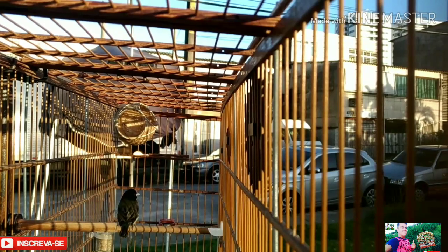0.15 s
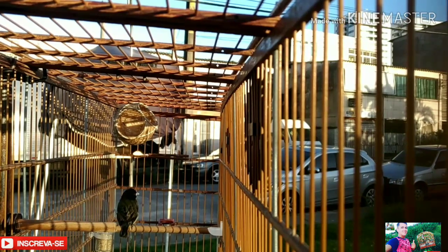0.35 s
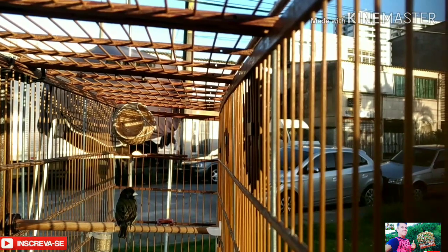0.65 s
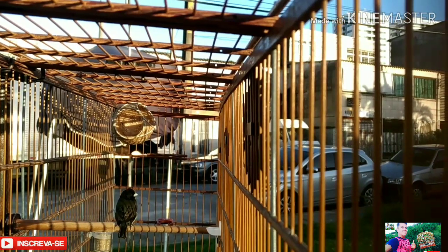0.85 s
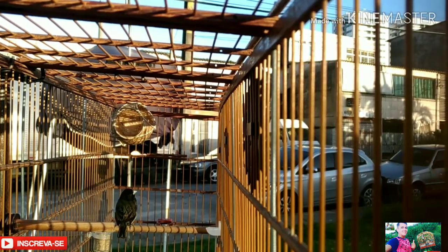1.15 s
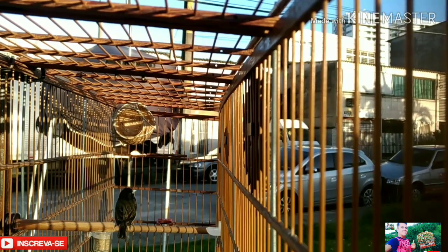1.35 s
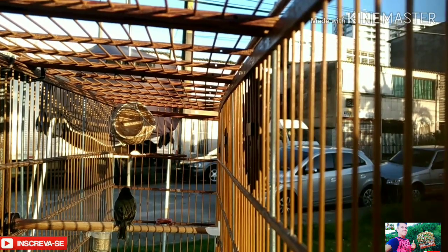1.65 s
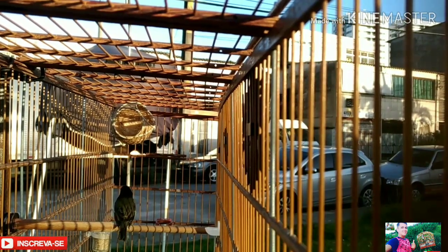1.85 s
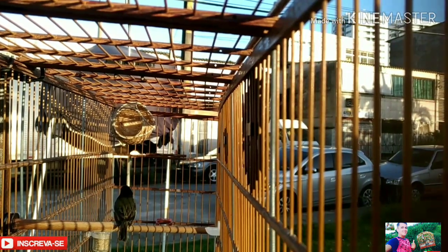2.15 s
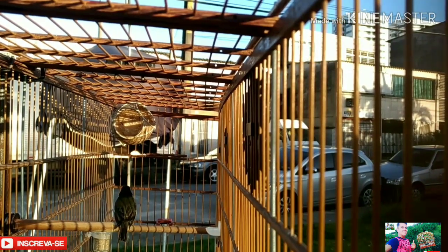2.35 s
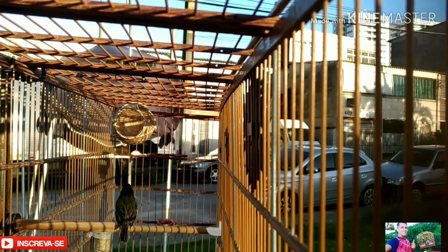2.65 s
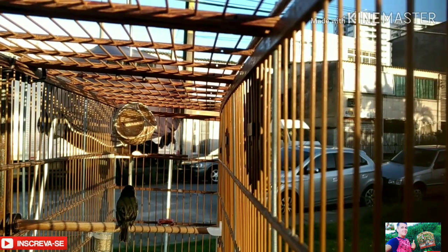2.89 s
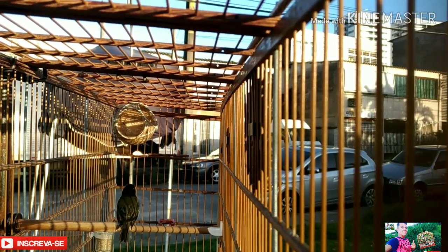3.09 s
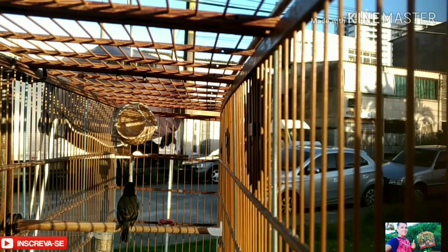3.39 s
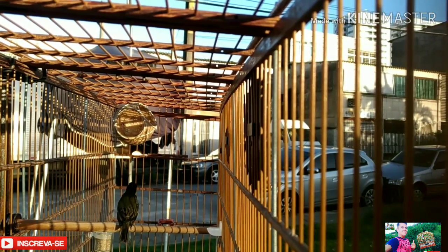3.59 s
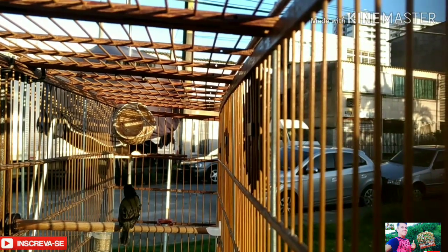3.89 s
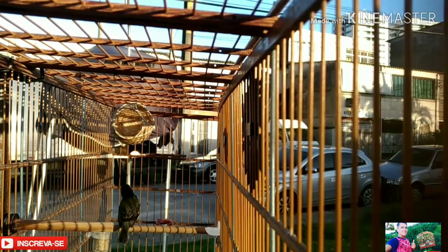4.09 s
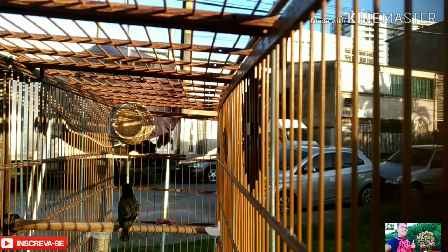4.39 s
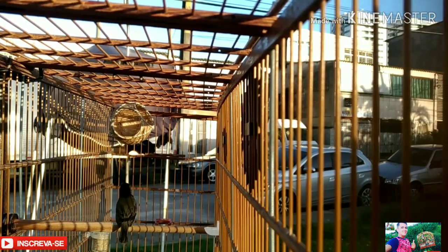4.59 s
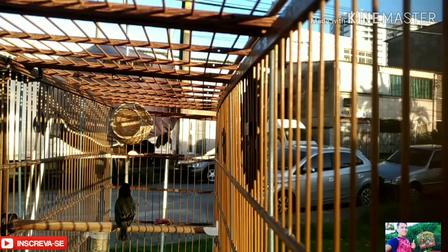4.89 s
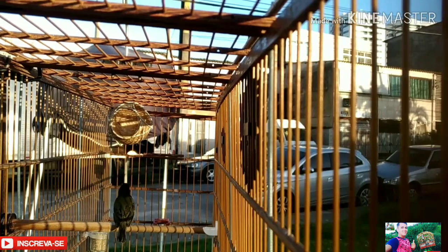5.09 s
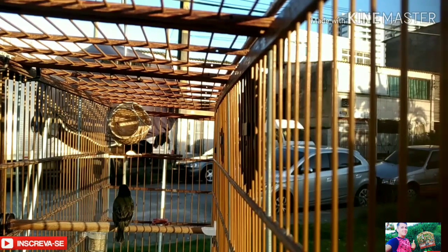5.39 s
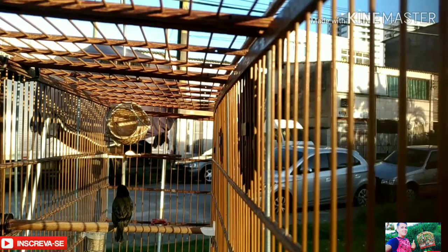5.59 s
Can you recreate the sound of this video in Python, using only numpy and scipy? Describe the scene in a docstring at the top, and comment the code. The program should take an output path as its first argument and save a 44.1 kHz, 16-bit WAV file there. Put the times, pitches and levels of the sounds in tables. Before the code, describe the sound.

A stereo outdoor street scene lasting about 5.7 seconds. Low, uneven traffic rumble and softer tyre hiss continue throughout, dipping slightly during the near song and rising again at the end. Very faint distant chirps come at 0.05 and 1.1-1.3 s. From 1.6 to about 2.9 s a far bird twitters in falling notes that quicken and sink in pitch. At 2.93 s a small caged bird starts close by with a tick and a soft rising whistle, then stronger trilled rising whistles at 3.3 and 3.5 s. A buzzy sinking trill follows at 3.7 s, steep down-slurs at 3.92 and 4.13 s, stuttered chips at 4.27 and 4.42 s, and a flick into a brief held, slightly falling whistle until 4.72 s. The tones are bright and nearly pure, with faint cage scatter and house-front echoes. Distant chirps follow from 4.8 s, the last a falling call near 5.3 s.

```python
"""Town traffic rumbles and hisses throughout, and small birds call and twitter far off.
Then a caged seedeater sings one quick phrase close by: a tick, three rising whistles, a trill, two steep
down-slurs, two stuttered chips and a held last note. House fronts across the street echo it.
The birds are gliding, nearly pure tones with overtones and breath noise; the traffic is shaped noise.
Delayed copies and fading noise tails make the cage, the walls and the street."""
import sys
import numpy as np
from scipy import signal
from scipy.fft import rfft, irfft, next_fast_len
from scipy.io import wavfile
from scipy.ndimage import uniform_filter1d, map_coordinates

SR = 44100
rng = np.random.default_rng(int(sys.argv[2]) if len(sys.argv) > 2 else 0)


def materialize(psi):
    """Save the field psi as 16-bit PCM at rate SR to the path in sys.argv[1].

    A 1-D psi becomes a single channel; in a 2-D psi each row is a channel.
    """
    bounded = np.clip(np.atleast_2d(psi).T, -1, 1)
    quanta = np.round(bounded * 32767).astype(np.int16)
    wavfile.write(sys.argv[1], SR, quanta)


N = 253134  # length of the scene in samples


def amp(db):
    """Turn decibels into a gain."""
    return 10 ** (np.asarray(db) / 20)


def unit(x):
    """Scale to an rms (average strength) of 1."""
    return x / np.sqrt(np.mean(x ** 2) + 1e-20)


def along(points, hz):
    """Read a table of (frequency, value) at any frequency, on a log frequency axis."""
    f, v = np.transpose(points)
    return np.interp(np.log(hz + 1), np.log(f), v)


def curves(rows, t):
    """Read each column after the time column at the times t."""
    s, *cols = np.transpose(rows)
    return [np.interp(t, s, c) for c in cols]


def wobble(rate, n):
    """A smooth random curve of n samples, with `rate` random points a second."""
    points = rng.standard_normal(int(n * rate / SR) + 4)
    return map_coordinates(points, [np.arange(n) * rate / SR])


def filtered(x, response):
    """Change the strength and timing of each frequency in x as `response` says."""
    m = next_fast_len(N + SR // 2)  # spare room, so that delays do not wrap round
    return irfft(rfft(x, m) * response(np.fft.rfftfreq(m, 1 / SR)), m)[..., :N]


def add(track, s, sound):
    """Mix a sound into a track at time s."""
    part = track[max(round(s * SR), 0):][:len(sound)]
    part += sound[:len(part)]


def note_times(length):
    """The sample times of a note, from zero."""
    return np.arange(max(int(length * SR), 16)) / SR


def gesture(rows):
    """The controls of one note, sample by sample from its first point to its last."""
    return curves(rows, np.arange(rows[0][0], rows[-1][0], 1 / SR))


def reflected(x, paths):
    """Each reflection is a delayed, weakened copy; this is their sum."""
    return filtered(x, lambda hz: sum(amp(db) * np.exp(-2j * np.pi * hz * delay) for delay, db in paths))


def diffuse(x, decay):
    """Many dense reflections act like a stereo noise tail in which each frequency dies at its own speed."""
    hz, t, z = signal.stft(rng.standard_normal((2, SR)), SR, nperseg=256)
    fading = z * amp(-60 * t / along(decay, hz)[:, None])
    tail = signal.istft(fading, SR, nperseg=256)[1]
    return signal.fftconvolve(np.atleast_2d(x), tail / np.linalg.norm(tail[0]), axes=1)[:, :N]


def patchy_noise(spectrum, patchy_db):
    """Stereo noise of rms 1: random gain patches in time and pitch make it uneven."""
    # how alike left and right are: (frequency [Hz], likeness [0-1])
    likeness = [(30, .55), (120, .62), (280, .8), (550, .48), (1100, .55), (2000, .3), (4000, .1),
                (10000, 0)]
    z = signal.stft(rng.standard_normal((2, N)), nperseg=512)[2]
    field = rng.standard_normal(z.shape[1:])
    field = uniform_filter1d(field, size=5, axis=0)  # smooth over frequency
    field = uniform_filter1d(field, size=14, axis=1)  # smooth over time
    pair = signal.istft(z * amp(patchy_db * unit(field)), nperseg=512)[1][:, :N]

    def shape(hz):
        # more of the shared middle sound makes left and right more alike
        turn = np.arccos(np.clip(along(likeness, hz), -1, 1)) / 2
        return amp(along(spectrum, hz)) * np.array([np.cos(turn), np.sin(turn)])

    mid, side = filtered(pair, shape)
    return unit(np.array([mid + side, mid - side]))


def traffic(lead=0.0003984):
    """Uneven engine rumble under smoother tyre wash; both reach the left microphone `lead` seconds early."""
    # level of the background rumble and hiss, which sinks during part of the near bird's song,
    # before the fixed lifts below: (time [s], engine rumble level [dB], tyre noise level [dB])
    background_levels = [(0.0, -46.5, -55.5), (0.05, -43.5, -56), (0.25, -52.5, -57.5), (0.3, -45.5, -57),
                         (1.28, -46.5, -56.5), (1.74, -41, -57.5), (1.8, -47, -55.5), (1.95, -42.5, -57.5),
                         (3.23, -47.5, -56.5), (3.74, -54.5, -60), (3.95, -50, -60), (3.98, -54.5, -60.5),
                         (4.33, -52, -58), (4.4, -49, -55.5), (4.68, -51.5, -61), (4.84, -47, -54.5),
                         (5.61, -44, -54.5), (5.74, -45.5, -53.5)]
    # tone colour of the engines: (frequency [Hz], relative level per Hz [dB])
    rumble_spectrum = [(20, -36), (30, -17), (40, -19.5), (50, -1), (60, 4.5), (78, -2), (100, -5.5),
                       (125, -4.5), (160, -10.5), (220, -13.5), (315, -20.5), (420, -37), (700, -57.5)]
    # tone colour of the tyres: (frequency [Hz], relative level per Hz [dB])
    tyre_spectrum = [(150, -19), (300, -2), (500, -2), (800, -5), (1100, -6), (1450, -10), (2100, -9),
                     (2800, -14), (4000, -20.5), (6000, -24), (8500, -19.5), (10000, -31.5), (14000, -39.5),
                     (15500, -55)]
    rumble_db, tyres_db = curves(background_levels, np.arange(N) / SR)
    rumble = amp(rumble_db + 2.0 + 0.99 * wobble(11, N)) * patchy_noise(rumble_spectrum, patchy_db=1.4)
    tyres = amp(tyres_db + 4.5) * patchy_noise(tyre_spectrum, patchy_db=1.18)

    def to_microphones(hz):
        left = amp(-.8) * np.exp(2j * np.pi * hz * lead)
        right = amp(.8) * np.ones(len(hz))
        return np.array([left, right])

    return filtered(rumble + tyres, to_microphones)


def syrinx(hz, loudness, rough, jitter_hz=22, hiss_db=-14, full_db=-20):
    """A bird's voice: overtones grow with effort; roughness shakes pitch and strength and lets air hiss."""
    # overtone strength by the overtone's own pitch: (frequency [Hz], level against the fundamental [dB])
    overtone_levels = [(6000, -19.5), (7500, -31.5), (9500, -30.5), (10800, -42.5), (12100, -34.5),
                       (13000, -39), (13900, -30.5), (14500, -52), (15200, -60.5)]
    n = len(hz)
    rasp_hz = 240 * rough * wobble(1500, n)
    flutter = 1 + .7 * rough * wobble(500, n)
    hz = hz + jitter_hz * wobble(400, n) + rasp_hz
    phase = 2 * np.pi * np.cumsum(hz) / SR
    overtones = np.zeros(n)
    for k in range(2, 5):
        strength = amp(along(overtone_levels, k * hz) + 3 * wobble(150, n))
        audible = k * hz < SR / 2  # leave out what the sample rate cannot hold
        overtones += strength * audible * np.sin(k * phase)
    hiss_band = signal.butter(2, [5500, 9800], "band", fs=SR, output="sos")
    hiss = signal.sosfilt(hiss_band, rng.standard_normal(n))
    effort = (loudness / amp(full_db)) ** .5  # 1 at the level full_db
    tone = np.sin(phase) + effort * overtones
    return loudness * (flutter * tone + effort * rough * amp(hiss_db) * hiss)


def chirp(length, start_hz, end_hz, db, rough):
    """A short voice note: its pitch glides in a straight line while it swells and fades."""
    u = np.linspace(0, 1, max(int(length * SR), 16))
    swell = np.abs(np.sin(np.pi * u)) ** 0.6
    return syrinx(start_hz + (end_hz - start_hz) * u, amp(db) * swell, rough)


def far_birds():
    """Distant birds: rough single chirps, and one twittering bird."""
    # single calls: (time [s], length [s], start pitch [Hz], end pitch [Hz], level [dB])
    far_calls = [ (0.052, .07, 6440, 5230, -69), (1.12, 0.061, 6280, 5670, -67),
                 (1.228, 0.036, 7600, 8000, -71), (1.288, .035, 7500, 8000, -71),
                 (1.878, 0.26, 4600, 4130, -67.5), (2.202, 0.055, 6200, 6650, -65),
                 (3.132, .018, 7900, 7270, -62), (3.168, .012, 7800, 7000, -59.5),
                 (3.21, .014, 7650, 7030, -58), (4.786, 0.076, 9300, 6800, -57),
                 (4.887, 0.021, 8200, 7300, -58), (4.952, 0.058, 9340, 6200, -53),
                 (5.14, 0.065, 4920, 5760, -58.5), (5.291, 0.24, 7530, 4540, -63), ]
    track = twitter()
    for s, *shape in far_calls:
        add(track, s, chirp(*shape, rough=0.8))
    return track


def twitter(count=11, size=16):
    """A run of falling notes that speeds up and sinks; each note is a spray of short chirps (flicks)."""
    # loudness of the run, before a small lift and random scatter: (time [s], level [dB])
    twitter_levels = [(1.6, -70), (2.1, -61), (2.4, -63), (2.9, -68.5)]
    start_s, first_gap_s, gap_shrink = 1.615, .195, .9  # each gap is 0.9 of the one before
    top_hz, sink_hz_per_s, note_fall_hz = 9360, 1000, 1312
    note_share = 0.65  # part of a gap over which the flicks start
    flick_s, flick_spread_hz = 0.015, 660
    track = np.zeros(N)
    gaps = first_gap_s * gap_shrink ** np.arange(count)
    starts = start_s + np.cumsum(gaps) - gaps
    for s, gap, db in zip(starts, gaps, curves(twitter_levels, starts)[0]):
        for u, scatter in zip(np.linspace(0, 1, size), rng.standard_normal((size, 3))):
            hz = top_hz - sink_hz_per_s * (s - start_s) - note_fall_hz * u
            start_hz, end_hz = hz + flick_spread_hz * scatter[:2]
            flick = chirp(flick_s, start_hz, end_hz, db + 0.5 + 2.0 * scatter[2], rough=0.58)
            add(track, s + u * note_share * gap, flick)
    return track


def seedeater():
    """The near bird's phrase: each kind of note is placed at its own time."""
    # opening tick (three rows) and flick into the last note (two rows):
    # (time [s], length [s], start pitch [Hz], end pitch [Hz], level [dB], roughness [0 = clean])
    chips = [(2.931, .056, 4690, 4570, -37.5, 1.1), (2.949, 0.02, 4680, 4916, -24, 0.3),
             (2.966, 0.022, 4880, 4800, -26.5, 0.3), (4.577, 0.031, 5350, 6060, -21.5, 0.3),
             (4.596, 0.018, 5800, 6480, -14, 0.25)]
    # rising whistles: (time [s], length [s], low pitch [Hz], high pitch [Hz],
    # middle of the climb after the start [s], climb time [s], level at the end [dB], trill depth [Hz])
    rises = [(2.986, 0.13, 3270, 3644, .05, .028, -21, 1.5),
             (3.296, 0.15, 3060, 3827, 0.073, .018, -14.5, 248.5),
             (3.498, 0.16, 3043, 3973, 0.087, .016, -14.5, 320)]
    # a trill that sinks and smooths into a plain tone: (time [s], pitch [Hz], level [dB], trill depth [Hz])
    trill = [(3.706, 6000, -31, 453), (3.727, 5550, -12.5, 498.5), (3.75, 5370, -11.5, 487),
             (3.773, 5024, -12.5, 430), (3.801, 4970, -11.5, 290.5), (3.823, 4715, -17, -1),
             (3.863, 4796, -14.5, 6)]
    # one list per steep down-slur: (time [s], pitch [Hz])
    slurs = [
        [(3.923, 9110), (3.953, 7970), (3.969, 7690), (3.989, 7210), (3.993, 6690), (4.007, 6380),
         (4.051, 5683), (4.066, 5800)],
        [(4.128, 9380), (4.162, 7980), (4.176, 8020), (4.2, 6760), (4.226, 6177), (4.236, 5500)],
    ]
    # stuttered chips: (time [s], level [dB])
    stutters = [(4.272, -15), (4.423, -16)]
    # held last note: (time [s], pitch [Hz])
    held = [(4.602, 5920), (4.618, 5590), (4.634, 5393), (4.67, 5450), (4.679, 5274), (4.718, 5173)]
    song = np.zeros(N)
    for s, *shape in chips:
        add(song, s, chirp(*shape))
    for s, *shape in rises:
        add(song, s, rise(*shape))
    add(song, trill[0][0], whistle(*gesture(trill), attack=.004, release=0.006))
    for rows in slurs:
        add(song, rows[0][0], slur(*gesture(rows)))
    for s, db in stutters:
        add(song, s, stutter(db))
    held_note = whistle(*gesture(held), db=-15.5, depth=0, attack=0.011, release=0.011)
    add(song, held[0][0], held_note)
    return song


def whistle(hz, db, depth, attack, release, trill_hz=150):
    """A slurred note: a trill swings its pitch, and it weakens unevenly at the foot of each swing."""
    n = len(hz)
    t = np.arange(n) / SR
    # trill_hz is the average speed at a pitch of 4200 Hz; higher notes trill faster
    speed = trill_hz * (hz / 4200) ** 0.329 * (1 + 0.08 * wobble(60, n))
    swing = np.sin(2 * np.pi * np.cumsum(speed) / SR)
    foot = (1 - swing) ** 2 / 4  # 1 at the lowest pitch, 0 at the highest
    dip_db = 8 * np.tanh(depth / 250) * (hz / 4200) * foot * (1 + .4 * wobble(80, n))
    gate = np.clip(np.minimum(t / attack, (t[-1] - t) / release), 0, 1)
    loudness = gate * amp(db - dip_db + wobble(120, n) / 2)
    return syrinx(hz + depth * swing, loudness, rough=0.018 + 0.00017 * depth * (hz / 5500) ** 2)


def rise(length, low_hz, high_hz, middle, climb, db, depth):
    """A whistle that scoops in from below and swells up an S-curve, trilling on the way."""
    scoop_hz, scoop_s = 171, .016
    buzz_at_s, buzz_width_s = 0.065, 0.028
    swell_db_per_s = 53
    t = note_times(length)
    hz = low_hz + (high_hz - low_hz) / (1 + np.exp((middle - t) / climb))
    hz = hz - scoop_hz * np.exp(-t / scoop_s)
    buzz = depth * np.exp(-((t - buzz_at_s) / buzz_width_s) ** 2)
    return whistle(hz, db - swell_db_per_s * (length - t), buzz, attack=0.038, release=0.0099)


def slur(hz):
    """A steep fall that starts thin, fills out and cracks where the voice changes register."""
    # pitches where the voice cracks: (pitch [Hz], width [Hz], dip [dB])
    breaks = [(7530, 150, 10.5), (6370, 37, 8.5)]
    # level by pitch, fullest in mid-fall: (pitch [Hz], level [dB])
    slur_level = [(5550, -18.5), (5750, -15), (6100, -11.5), (7000, -11), (7950, -9.5), (8300, -22.5),
                  (9200, -30)]
    crack_hz_per_db = 19.5  # trill depth for each dB of dip
    crack_db = sum(db * np.exp(-((hz - centre) / width) ** 2) for centre, width, db in breaks)
    level_db = along(slur_level, hz) - crack_db
    return whistle(hz, level_db, crack_hz_per_db * crack_db, attack=0.0088, release=0.0076)


def stutter(db):
    """Quick upward strokes, then a tone that droops away."""
    # strokes from the high and low side of the syrinx (voice organ) in turn: (delay [s], length [s],
    # start pitch [Hz], end pitch [Hz], level against the stutter [dB], roughness [0 = clean])
    strokes = [(.001, .019, 4500, 5510, -0.5, 0.4), (.014, .012, 4180, 4470, -4, 0.4),
               (0.024, .016, 4430, 5320, 1.5, 0.37), (.037, .017, 4080, 4400, -2.5, .15),
               (0.052, 0.013, 4500, 5035, -3, 0.5)]
    drop_delay_s, drop_s, drop_hz, drop_fall_hz = .061, .046, 3844, 854
    call = np.zeros(SR // 4)
    for delay, length, start_hz, end_hz, stroke_db, rough in strokes:
        add(call, delay, chirp(length, start_hz, end_hz, db + stroke_db, rough))
    hz = drop_hz - drop_fall_hz * (note_times(drop_s) / drop_s) ** 2.1
    add(call, drop_delay_s, whistle(hz, db - 4, depth=0, attack=0.0091, release=0.0091))
    return call


def two_microphones(x, lead=0.0003474):
    """The left microphone hears the bird `lead` seconds earlier but is shaded in the treble."""
    # loudness balance: (frequency [Hz], left minus right [dB])
    balance = [(3000, 5.5), (3500, -2), (3900, -9), (4800, -8.5), (5500, -12), (6500, -0.5), (8000, -12),
               (12000, -1)]

    def response(hz):
        ratio = amp(along(balance, hz))
        left = ratio * np.exp(2j * np.pi * hz * lead)
        return np.array([left, np.ones(len(hz))]) * 2 / (1 + ratio)

    return filtered(x, response)


def cage(song):
    """The near song with its bounces off roof and floor, and its scatter among the bars."""
    # roof and floor of the cage: (delay [s], level [dB])
    roof_and_floor = [(.0007, -23.5), (.0031, -13)]
    # scatter among the bars: (frequency [Hz], time to fade by 60 dB [s])
    bar_decay = [(3000, 0.14), (12000, 0.18)]
    direct = amp(-0.07) * two_microphones(song + reflected(song, roof_and_floor))
    return direct + amp(-22) * diffuse(direct, bar_decay)


def echoes(x, dull_hz=7500):
    """Separate answers from the house fronts, dulled by the air and smeared by the masonry."""
    # house fronts: (delay [s], level [dB])
    walls = [(.074, -35.5), (0.11, -39), (0.158, -35.5)]
    # scatter on a house front: (frequency [Hz], time to fade by 60 dB [s])
    facade_decay = [(3000, 0.021), (12000, 0.061)]
    dulled = filtered(reflected(x, walls), lambda hz: 1 / (1 + (hz / dull_hz) ** 4))
    return diffuse(dulled, facade_decay)


def scene():
    """Traffic, far birds, the near bird in its cage and the street's answer, added together."""
    # reverberation of the street: (frequency [Hz], time to fade by 60 dB [s])
    street_decay = [(2000, 0.43), (3800, 0.74), (5400, 0.7), (7000, 0.79), (8000, 0.68), (14000, 0.1)]
    song, far = seedeater(), far_birds()
    street = amp(-25) * diffuse(song, street_decay) + echoes(song)
    distant = amp(-.5) * far + amp(-5) * diffuse(far, street_decay)
    return traffic() + distant + cage(song) + street


def record(dry):
    """The treble fades out over the last 700 Hz below a limit; nothing is kept above it."""
    top_hz = 15000
    return filtered(dry, lambda hz: np.clip((top_hz - hz) / 700, 0, 1))


dry = scene()
out = record(dry)
materialize(out)
```